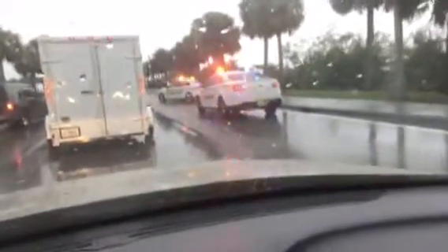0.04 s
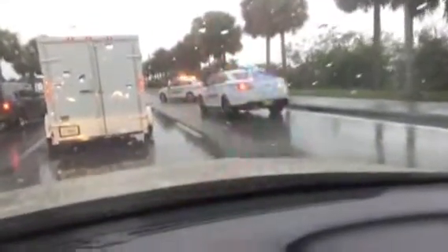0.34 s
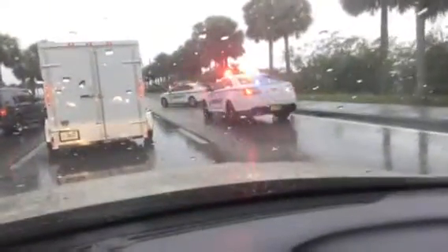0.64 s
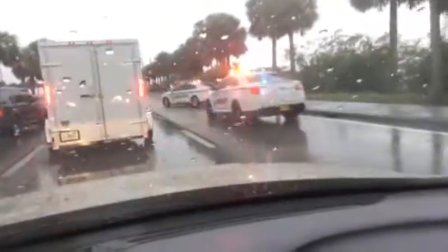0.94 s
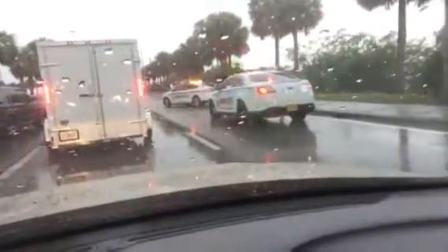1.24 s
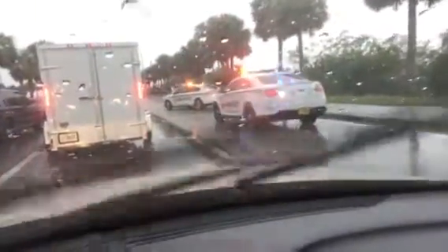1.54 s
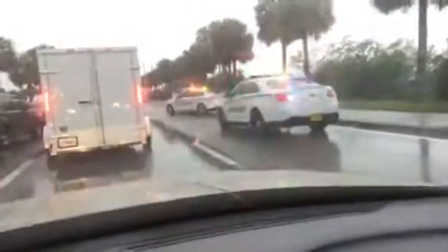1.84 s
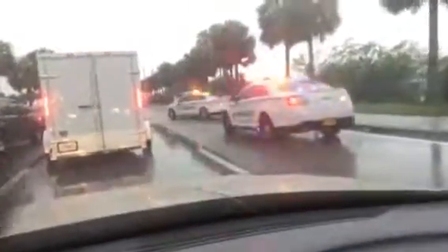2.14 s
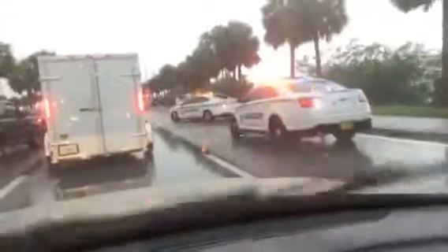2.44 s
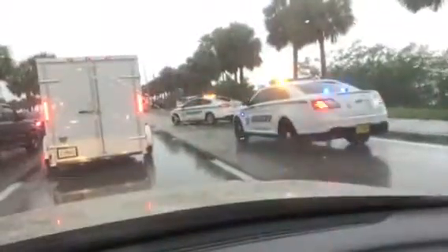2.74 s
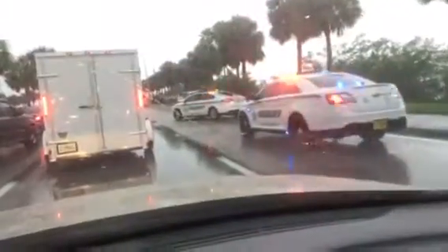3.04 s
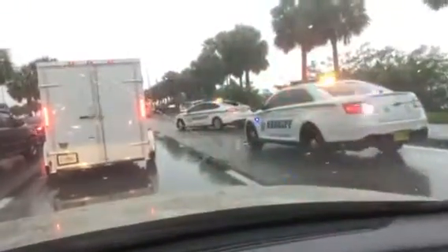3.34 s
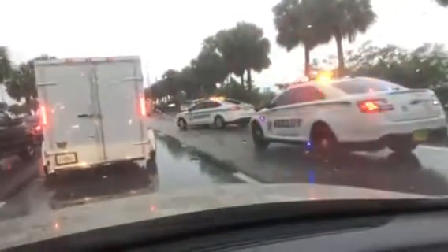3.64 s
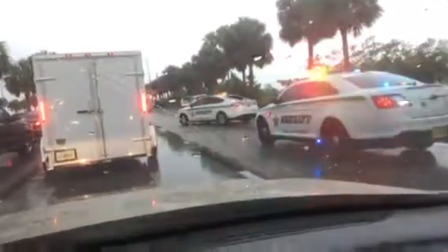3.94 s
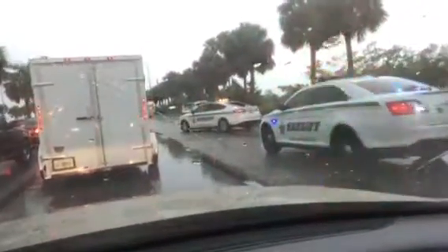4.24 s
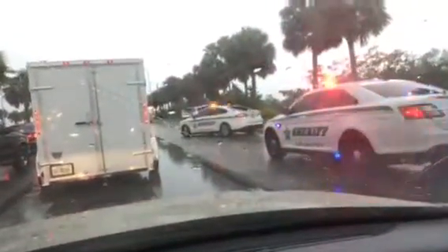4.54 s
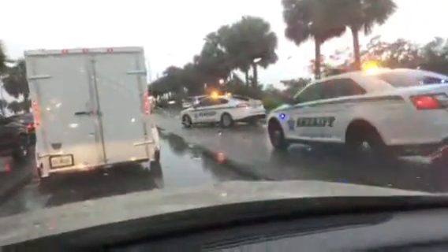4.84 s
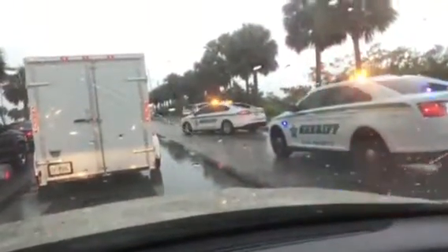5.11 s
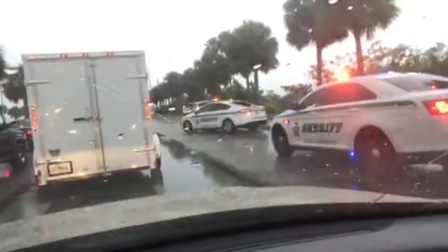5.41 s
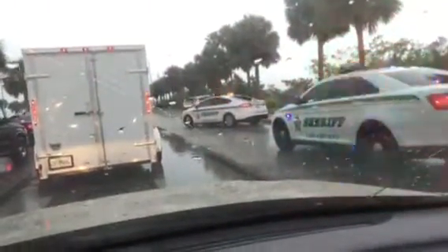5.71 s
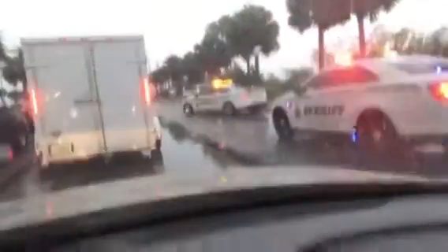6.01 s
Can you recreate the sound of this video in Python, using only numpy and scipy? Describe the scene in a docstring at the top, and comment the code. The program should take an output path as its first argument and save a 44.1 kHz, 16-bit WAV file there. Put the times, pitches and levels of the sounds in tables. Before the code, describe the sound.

Inside a slowly moving car, raindrops tick on the glass, the wipers thump through one sweep and the engine settles to idle.

```python
"""From the front seat of a car creeping through traffic in the rain, on a phone microphone.
Throughout, the road rumbles, drops patter on the roof overhead and tick on the windshield close by.
The engine booms as it pulls. At 1.4 s the wipers make one sweep: they thump as they start, turn over
and park, and swish over the wet glass in between. By 3 s the engine has settled to idle,
and toward the end tyre spray hisses faintly outside."""
import sys
import numpy as np
from scipy import signal
from scipy.fft import rfft, irfft, next_fast_len
from scipy.io import wavfile
from scipy.ndimage import map_coordinates

SR = 44100
rng = np.random.default_rng(int(sys.argv[2]) if len(sys.argv) > 2 else 0)


def materialize(psi):
    """Save the field psi as 16-bit PCM at rate SR to the path in sys.argv[1].

    A 1-D psi becomes a single channel; in a 2-D psi each row is a channel.
    """
    bounded = np.clip(np.atleast_2d(psi).T, -1, 1)
    quanta = np.round(bounded * 32767).astype(np.int16)
    wavfile.write(sys.argv[1], SR, quanta)


N = 276507


def amp(db):
    """Decibels to gain."""
    return 10 ** (np.asarray(db) / 20)


def unit(x):
    """Scaled to rms 1."""
    return x / np.sqrt(np.mean(x ** 2) + 1e-20)


def curve(rows):
    """Straight lines through (seconds, value) rows, one value per sample."""
    return np.interp(np.arange(N) / SR, *np.transpose(rows))


def wobble(rate):
    """A smooth random curve, rate knots a second."""
    return map_coordinates(rng.standard_normal(int(N * rate / SR) + 4), [np.arange(N) * rate / SR])


def swell(s, rise_s, fall_s):
    """A smooth hump that reaches 1 at time s."""
    t = np.arange(N) / SR - s
    return np.exp(-(t / np.where(t < 0, rise_s, fall_s)) ** 2)


def colour(x, points, size=4096):
    """A causal filter of unit energy with the (Hz, dB) shape."""
    hz, db = np.transpose(points)
    bin_hz = np.fft.rfftfreq(size, 1 / SR)
    log_gain = np.log(amp(np.interp(np.log(bin_hz + 1), np.log(hz), db)))
    cepstrum = irfft(log_gain)[:size // 2]
    cepstrum[1:] *= 2  # minimum phase
    ring = irfft(np.exp(rfft(cepstrum, size)))
    return signal.fftconvolve(x, ring / np.linalg.norm(ring))[:len(x)]


def noise(points):
    """Steady noise of rms 1 with the (Hz, dB) shape."""
    return unit(colour(rng.standard_normal(N + SR), points)[SR:])


def add(track, s, sound):
    """Mixes a sound into the track at time s."""
    part = track[max(0, round(s * SR)):][:len(sound)]
    part += sound[:len(part)]


# The car rolling, heard through the body. Each row: time in seconds, rumble level in dB.
ROAD_LEVELS = [(0, -47.5), (1.6, -45), (4.3, -46.5), (6.27, -46.5)]
# Tyre spray on the wet road outside. Each row: time of the crest in seconds, level in dB.
SPRAY_SWELLS = [(4.7, -66), (5.8, -73)]
# Rumble, spray and fizz as they reach the seat. Each row: frequency in Hz, relative level in dB.
RUMBLE_SPECTRUM = [(20, -50), (32, -14.5), (48, 1.5), (65, 0.5), (100, -1.5), (155, -13.5), (195, -9),
                   (260, -15.5), (350, -14.5), (500, -24), (900, -38.5), (2000, -94)]
SPRAY_SPECTRUM = [(1000, -37), (2600, -7), (3400, 9.5), (4200, 4), (5200, -34), (12000, -37)]
FIZZ_SPECTRUM = [(4000, -35), (7000, -10), (8700, 3), (9900, -7), (11000, -13), (16000, -12)]


def road():
    """Tyres and traffic rumble through the body; spray hisses outside and fizzes briefly."""
    rumble = amp(curve(ROAD_LEVELS) + 0.79 * wobble(9)) * noise(RUMBLE_SPECTRUM)
    spray_gain = sum(amp(db) * swell(s, rise_s=0.21, fall_s=0.63) for s, db in SPRAY_SWELLS)
    fizz_gain = amp(-69) * swell(5.565, rise_s=0.048, fall_s=0.02)
    return rumble + spray_gain * noise(SPRAY_SPECTRUM) + fizz_gain * noise(FIZZ_SPECTRUM)


# The engine pulling, heard in the cabin. Each row: time in seconds, pitch of the boom in Hz.
BOOM_PITCH = [(0, 52.6), (.45, 56.24), (.75, 66.1), (1.05, 82.66), (1.2, 83.8), (1.5, 78.93), (1.95, 75.63),
              (2.55, 77.64), (2.9, 71.5)]
# The idle hum. Each row: multiple of the firing rate, relative level in dB.
IDLE_ORDERS = [(2, 0), (3, -5), (4, -4.5), (5, -1), (6, -15), (7, -17.5), (8, -12), (9, -14)]


def engine(firing_hz=25.29, boom_db_per_octave=11.5):
    """One engine order booms under load, louder with speed; at idle the firing harmonics take over."""
    boom_hz = curve(BOOM_PITCH)
    throttle = curve([(2.8, 1), (2.98, 0)])  # the foot leaves the pedal
    boom_db = -43.5 + boom_db_per_octave * np.log2(boom_hz / 76.5) + 0.79 * wobble(12)
    boom = throttle * amp(boom_db) * unit(np.sin(2 * np.pi * np.cumsum(boom_hz) / SR))
    idle_db = curve([(0, -59), (2.6, -45)])
    phase = 2 * np.pi * np.cumsum(firing_hz * (1 + 0.00832 * wobble(4))) / SR
    hum = sum(amp(db + 1.6 * wobble(8)) * np.sin(order * phase + rng.uniform(0, 2 * np.pi))
              for order, db in IDLE_ORDERS)
    return boom + amp(idle_db) * unit(hum)


def splat(pane_t60, cabin_db, front_db, dull_hz, front_t60=0.0027):
    """One drop of unit energy: a sharp front, a duller shiver of the pane, the padded cabin's answer."""
    t = np.arange(SR // 12) / SR
    front = t * amp(-60 * t / front_t60) * rng.standard_normal(len(t))
    onset = 1 - np.exp(-t / 0.00078)
    decay = amp(-60 * t / pane_t60) + amp(cabin_db - 60 * t / 0.094)
    burst = onset * decay * rng.standard_normal(len(t))
    shiver = signal.lfilter(*signal.butter(1, dull_hz, fs=SR), burst)
    crack = amp(front_db) * unit(front) + unit(shiver)
    return crack / np.linalg.norm(crack)


def shower(per_second, spread_db, spots=16):
    """Random drops of all sizes on a number of spots, each spot with its own ring; rms 1."""
    rings = [splat(pane_t60=0.014, cabin_db=-7, front_db=-3, dull_hz=6660) for _ in range(spots)]
    when, chance = rng.random((int(per_second * N / SR), 2)).T
    size = np.minimum(-np.log(chance), np.e)  # many small drops, few large
    hits = np.zeros((spots, N))
    hits[np.arange(len(when)) % spots, (when * N).astype(int)] = amp(spread_db * size)
    return unit(signal.oaconvolve(hits, np.array(rings), axes=1).sum(0)[:N])


# Gusts of rain on the car. Each row: time of the crest in seconds, extra level in dB.
FLURRIES = [(.08, 1.5), (.6, 2), (1.08, 4), (2.68, 1.5), (3.2, 1.2), (3.8, 1.9), (5.5, 3)]
# Rain from inside: the roof overhead, the windshield ahead and the tiniest drops on it.
# Each row: frequency in Hz, relative level in dB.
ROOF_SPECTRUM = [(100, -16), (300, 4), (600, 3), (1000, 1.5), (1500, -1.5), (2000, -5), (3500, -7.5),
                 (4900, -14.5), (6000, -17.5), (8000, -24), (10500, -28), (12000, -25.5), (16000, -27)]
GLASS_SPECTRUM = [(150, -17), (500, 3.5), (1000, 7), (1500, 6.5), (2000, 2.5), (2700, 5), (4000, 4),
                  (4900, -2.5), (6000, -3.5), (8000, -11.5), (9500, -13.5), (10400, -20.5), (11500, -17),
                  (16000, -23)]
PINPRICK_SPECTRUM = [(2000, -25), (5000, -3), (8000, -2), (10400, -4), (12000, 0), (16000, -2)]


def rain(ease_db_per_s=0.0466, tick_ease_db_per_s=0.5):
    """Fine drops merge to a wash on the lined roof; nearer ones tick on the glass; gusts swell both."""
    t = np.arange(N) / SR
    gust_db = sum(db * swell(s, rise_s=0.09, fall_s=0.09) for s, db in FLURRIES)
    level_db = -54 - ease_db_per_s * t + gust_db
    patter = amp(-5 + 0.7 * wobble(14)) * colour(shower(per_second=380, spread_db=4), ROOF_SPECTRUM)
    wash = amp(-6) * noise(ROOF_SPECTRUM)
    ticks = amp(-7.5) * colour(shower(per_second=110, spread_db=9), GLASS_SPECTRUM)
    pinpricks = amp(-24.5) * colour(shower(per_second=22, spread_db=7.5), PINPRICK_SPECTRUM)
    glass_fade = amp(-tick_ease_db_per_s * t)  # the ticks fade faster as the car slows
    return amp(level_db) * (patter + wash + glass_fade * (ticks + pinpricks))


# The fattest drops on the windshield, close to the microphone.
# Each row: start in seconds, relative level of the crack in dB, relative level of the snap in dB.
GLASS_DROPS = [(0.0704, -40.5, -55.5), (0.1283, -33, -54), (0.2886, -34.5, -59), (0.3509, -38, -54),
               (0.5225, -36, -49.5), (0.6414, -46, -51.5), (0.6472, -40, -49.5), (0.6975, -35, -53),
               (0.7657, -44, -58), (0.9217, -39.5, -58), (0.9777, -46, -59), (1.0219, -33, -52.5),
               (1.1181, -37, -58), (1.2692, -40, -51.5), (1.3309, -29.5, -50), (1.4499, -43, -50),
               (1.783, -33.5, -60), (1.94, -34, -52), (2.5628, -32.5, -55), (2.613, -27, -50),
               (2.6991, -32, -53), (2.8695, -39, -55.5), (2.9156, -36, -49), (2.9498, -35, -56),
               (3.2352, -30.5, -54), (3.358, -35.5, -52.5), (3.3917, -30.5, -58), (3.767, -36, -55),
               (3.9, -33.5, -56), (4.0439, -36.5, -79), (4.0954, -35, -55.5), (4.1924, -34, -54.5),
               (4.2924, -34.5, -50.5), (4.4917, -46, -57), (4.8066, -38, -55), (4.9256, -36.5, -55),
               (5.0557, -34, -56.5), (5.33, -37.5, -59), (5.4615, -34, -61), (6.1785, -34.5, -58)]
# The fattest drops overhead. Each row: start in seconds, relative level in dB.
ROOF_DROPS = [(.565, -47), (1.059, -40), (1.898, -41), (2.387, -40), (2.488, -40), (3.119, -41),
              (3.155, -40.5), (3.933, -44), (4.118, -39.5), (4.335, -43), (4.639, -44), (5.509, -45.5),
              (6.202, -39)]
# What the roof lining lets through. Each row: frequency in Hz, relative level in dB.
LINING_SPECTRUM = [(120, 11), (330, 4), (700, 2.5), (1100, 0), (1500, 0), (2200, -9.5), (4000, -10),
                   (12000, -31)]


def heavy_drops(crossover_hz=4500):
    """Fat drops crack on the windshield with a bright snap on top; on the roof the lining muffles them."""
    glass, roof = np.zeros(N), np.zeros(N)
    lowpass = signal.butter(2, crossover_hz, fs=SR)
    highpass = signal.butter(1, crossover_hz, "high", fs=SR)
    for s, crack_db, snap_db in GLASS_DROPS:
        crack = splat(pane_t60=0.018, cabin_db=-3.5, front_db=2.5, dull_hz=5600, front_t60=0.0039)
        snap = splat(pane_t60=0.02, cabin_db=-1, front_db=5.5, dull_hz=7100, front_t60=0.0032)
        add(glass, s, amp(crack_db + 11.5) * signal.lfilter(*lowpass, crack))
        add(glass, s, amp(snap_db + 33) * signal.lfilter(*highpass, snap))
    for s, db in ROOF_DROPS:
        thud = splat(pane_t60=0.13, cabin_db=-8, front_db=-0.5, dull_hz=5300, front_t60=0.0029)
        add(roof, s, amp(db + 20) * thud)
    return colour(glass, GLASS_SPECTRUM) + colour(roof, LINING_SPECTRUM)


# The cowl under the wipers, at the foot of the windshield.
# Each row: mode frequency in Hz, relative level in dB, time to fall 60 dB in seconds.
COWL_MODES = [(70, 5, 0.19), (133, 3, 0.12), (196.4, 7.5, 0.058), (237, -10.5, 0.12), (293.7, -3.5, 0.1),
              (334, -6, 0.061), (593, -9, 0.06), (987, 2.5, 0.042), (1454, 3, 0.05)]


def knock(db, band_hz, attack_s=0.0025, db_per_octave=9):
    """The cowl rings most near band_hz: a slow push wakes the low modes, a quick knock the high ones."""
    t = np.arange(SR // 3) / SR
    ring = np.zeros(len(t))
    for hz, mode_db, t60 in COWL_MODES:
        start_db = mode_db - db_per_octave * abs(np.log2(hz / band_hz))
        ring += amp(start_db - 60 * t / t60) * np.sin(2 * np.pi * hz * t)
    return amp(db) * ring * (1 - np.exp(-t / attack_s))


# The blade's slap, heard through the glass. Each row: frequency in Hz, relative level in dB.
SLAP_SPECTRUM = [(80, -7.5), (300, 5.5), (480, -5), (700, -3), (1150, -7.5), (1800, -19), (3000, -15.5),
                 (5000, -27.5), (12000, -45.5)]


def slap(db, rise_s=0.0023, t60=0.06):
    """The wet rubber slaps the glass."""
    t = np.arange(SR // 3) / SR
    envelope = amp(db - 60 * t / t60) * (1 - np.exp(-t / rise_s))
    return colour(envelope * rng.standard_normal(len(t)), SLAP_SPECTRUM)


# The wiper arms start, turn over and park, about an arm's length away. Each row: start in seconds,
# relative thump level in dB, strongest band in Hz, relative slap level in dB, slap's lead in seconds.
WIPER_BLOWS = [(1.429, -35, 230, -57, 0.0117), (1.474, -18.5, 199, -28, .012),
               (1.587, -30.5, 220, -39.5, .003), (2.098, -30, 278.6, -36.5, .017),
               (2.171, -23, 74, -29.5, .020), (2.732, -25, 184.7, -39.5, 0.011)]
# The blades go up and back. Each row: time of full speed in seconds, relative level in dB.
WIPER_STROKES = [(1.74, -55), (2.54, -60)]
# Rubber juddering and swishing on the wet glass. Each row: frequency in Hz, relative level in dB.
JUDDER_SPECTRUM = [(60, -11), (120, 0), (230, 1.5), (380, -6.5), (500, -5), (650, -16.5), (1100, -19),
                   (3000, -29), (8000, -49)]
SWISH_SPECTRUM = [(300, -11), (1000, 4), (3000, -6), (5500, -3), (7500, -13), (10000, -22.5), (16000, -25)]


def wipers(flip_hz=262, rebound_s=0.029, rebound_hz=240):
    """The arms thump and the rubber judders; in each stroke the blades swish and the linkage rumbles."""
    knocks = np.zeros(N)
    for s, db, band_hz, slap_db, lead_s in WIPER_BLOWS:
        add(knocks, s - lead_s, knock(slap_db + 3.5, flip_hz) + slap(slap_db))  # the rubber flips
        add(knocks, s, knock(db, band_hz) + slap(slap_db + 0.4))  # the arm thumps
        add(knocks, s + rebound_s, knock(db - 7.5, rebound_hz))  # and bounces once
    judder_gain = sum(amp(db - 22) * swell(s, rise_s=0.025, fall_s=0.077) for s, db, *_ in WIPER_BLOWS)
    judder = judder_gain * noise(JUDDER_SPECTRUM)
    stroke_gain = sum(amp(db) * swell(s, rise_s=0.24, fall_s=0.13) for s, db in WIPER_STROKES)
    swish = amp(1.02 * wobble(37)) * noise(SWISH_SPECTRUM)
    linkage = amp(11.5) * noise(RUMBLE_SPECTRUM)
    return knocks + judder + stroke_gain * (swish + linkage)


def scene():
    """Everything as heard from the front seat, in mono."""
    return (rain() + heavy_drops() + engine() + road() + wipers())[None]


def record(dry):
    """The phone keeps nothing above its band limit."""
    top_hz = 15900
    size = next_fast_len(N + SR // 2)
    passband = np.fft.rfftfreq(size, 1 / SR) < top_hz
    return irfft(rfft(dry, size) * passband, size)[:, :N]


dry = scene()
out = record(dry)
materialize(out)
```